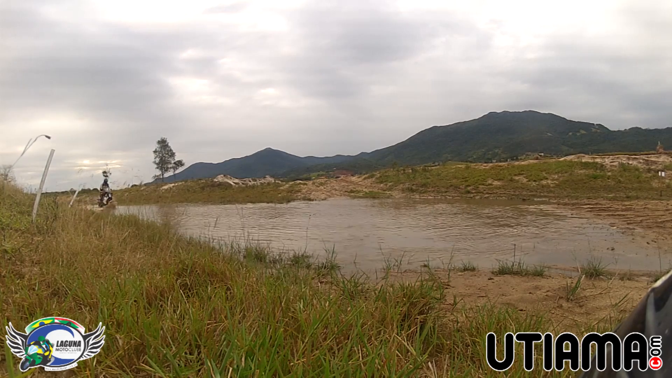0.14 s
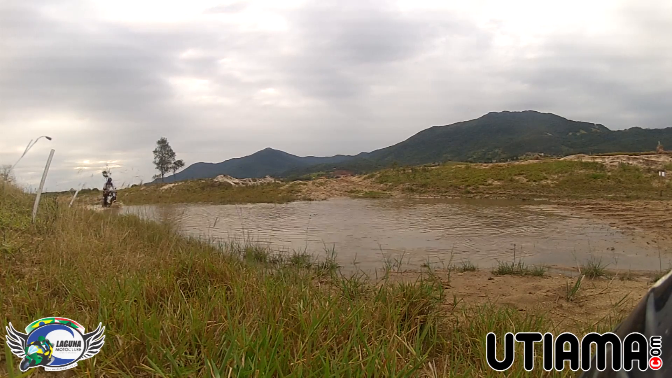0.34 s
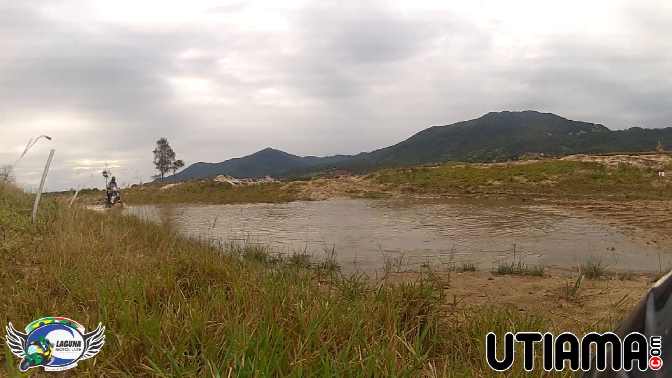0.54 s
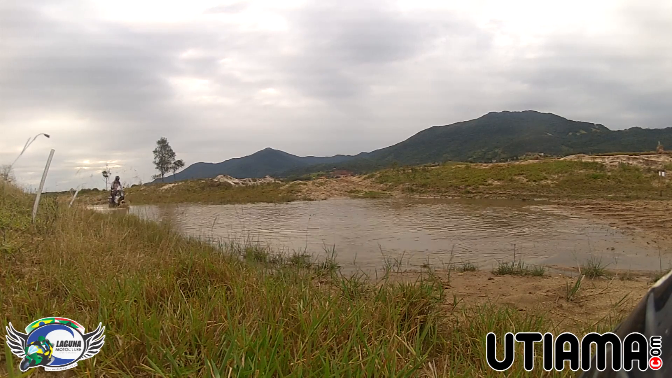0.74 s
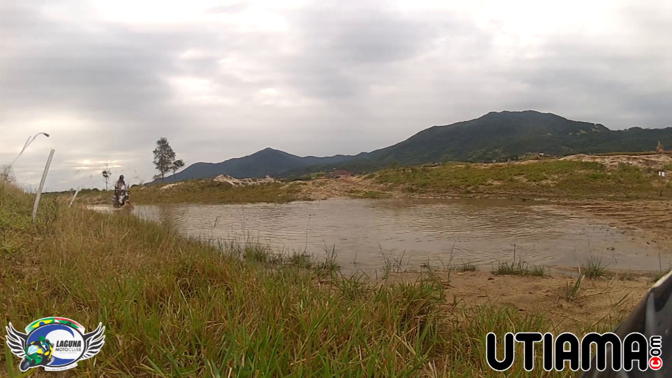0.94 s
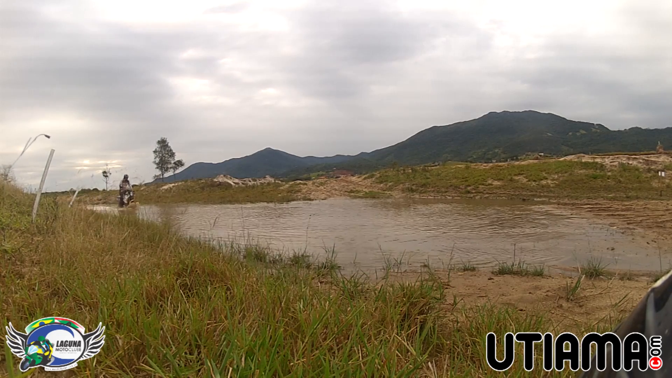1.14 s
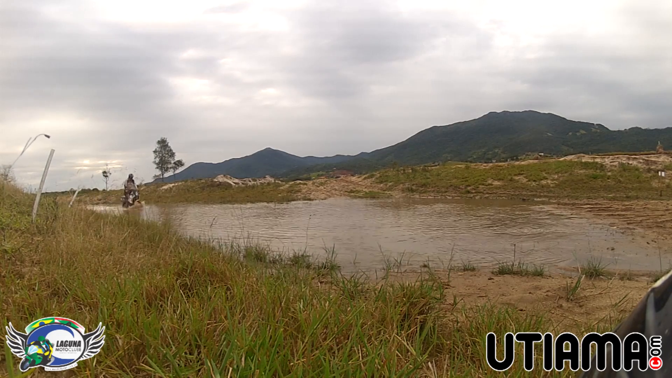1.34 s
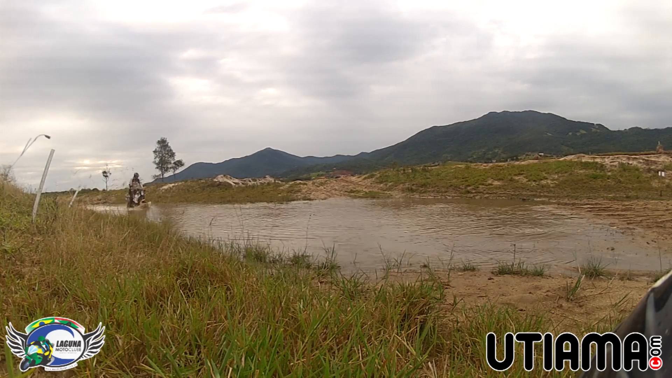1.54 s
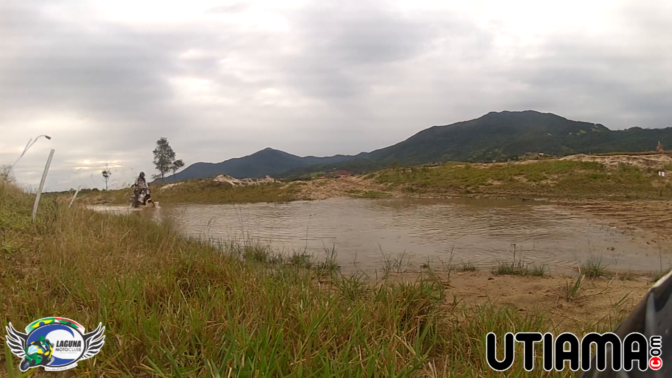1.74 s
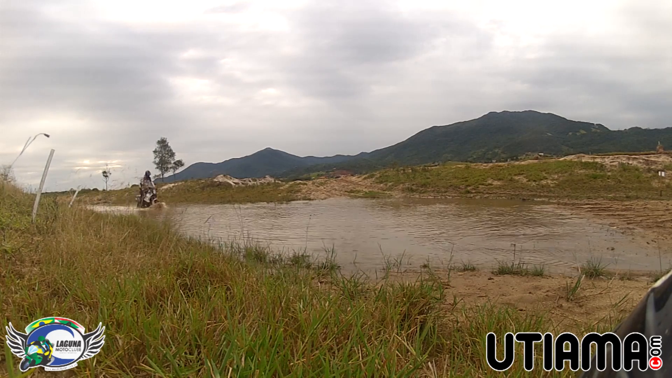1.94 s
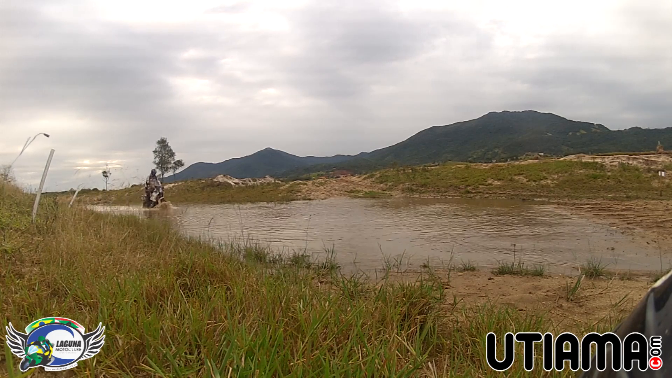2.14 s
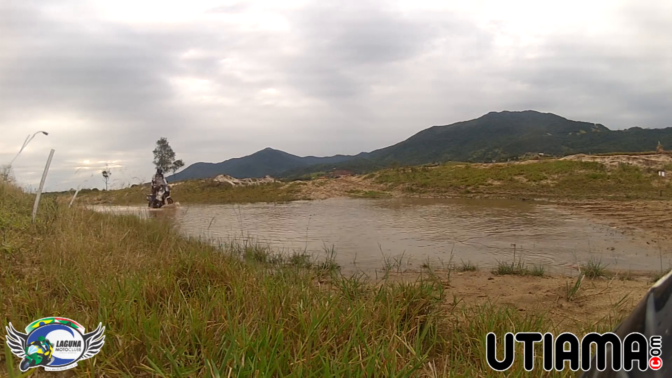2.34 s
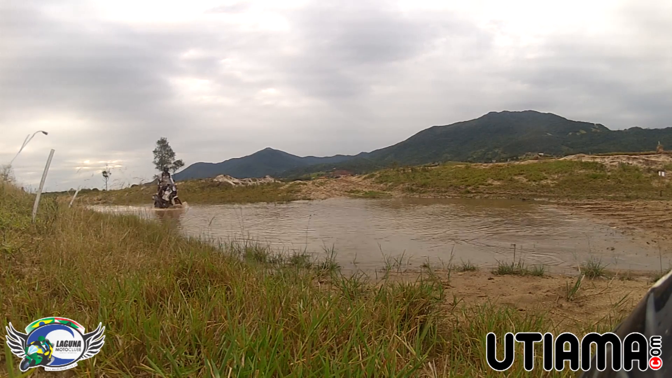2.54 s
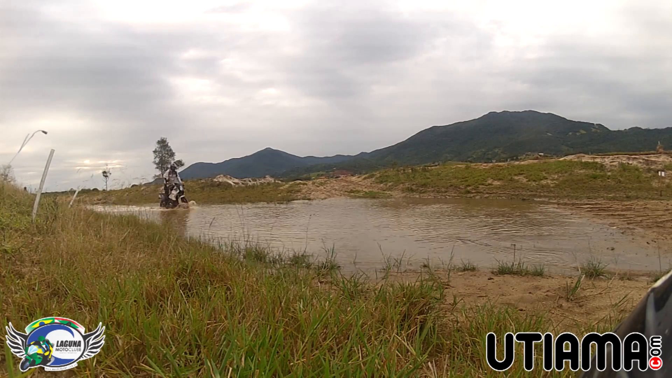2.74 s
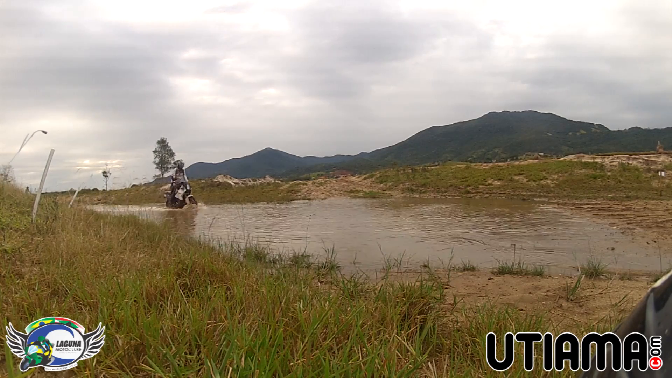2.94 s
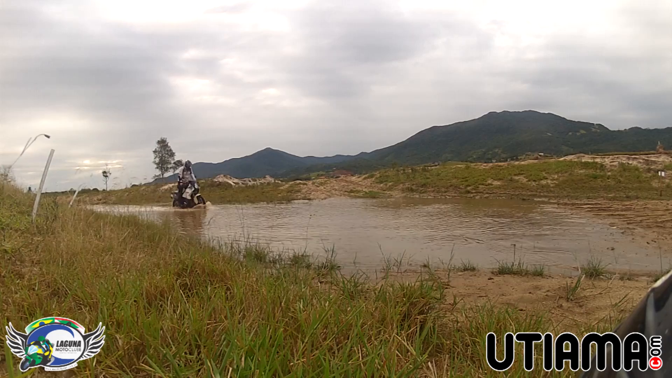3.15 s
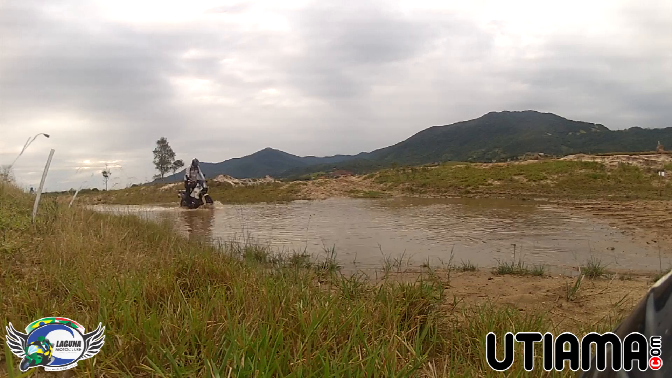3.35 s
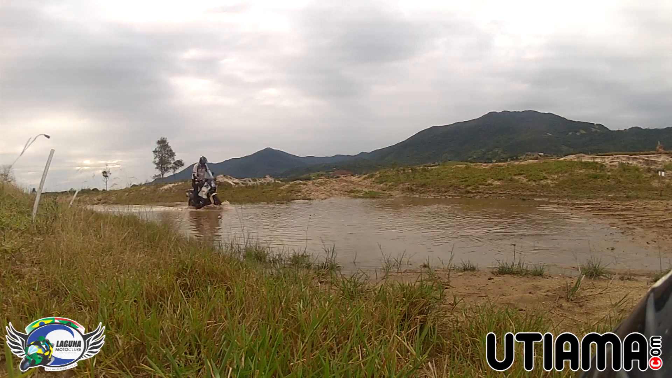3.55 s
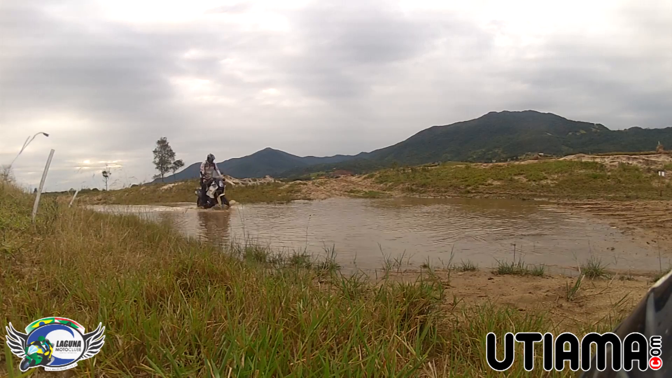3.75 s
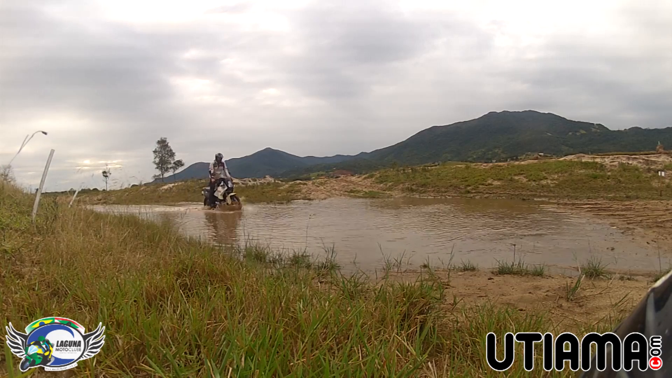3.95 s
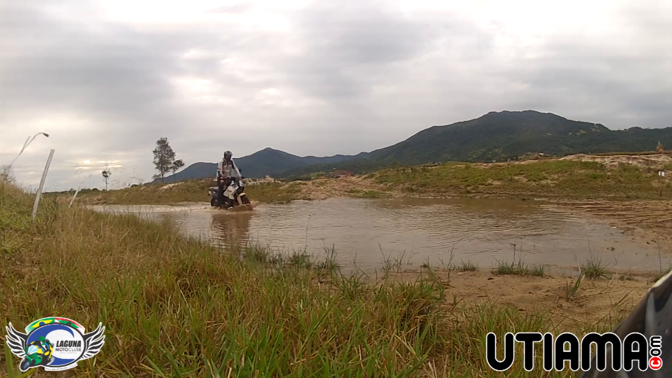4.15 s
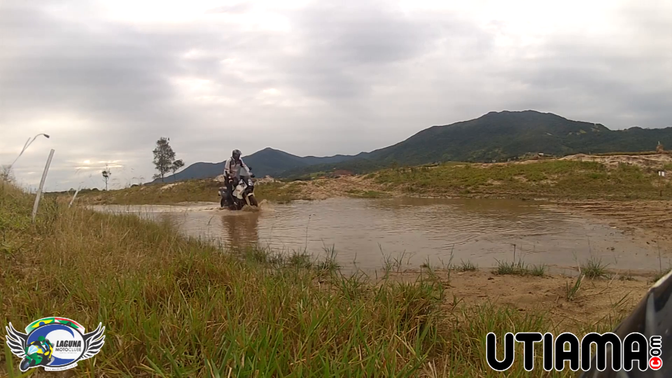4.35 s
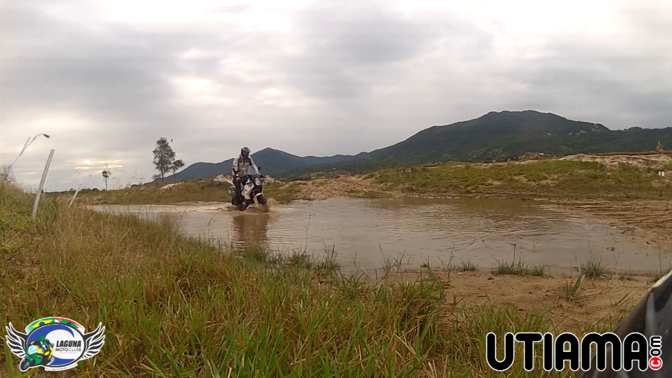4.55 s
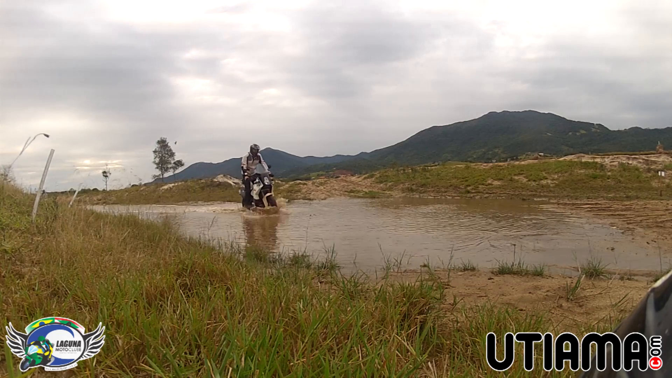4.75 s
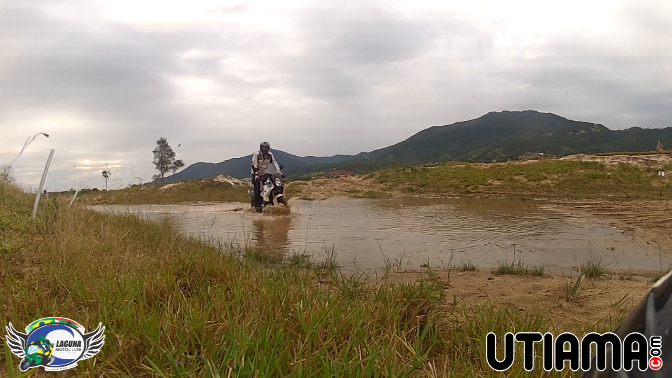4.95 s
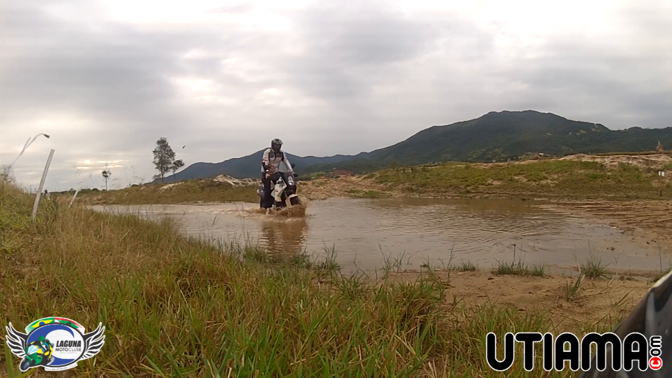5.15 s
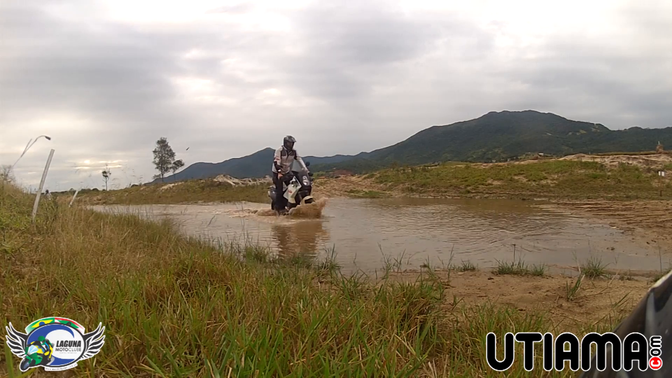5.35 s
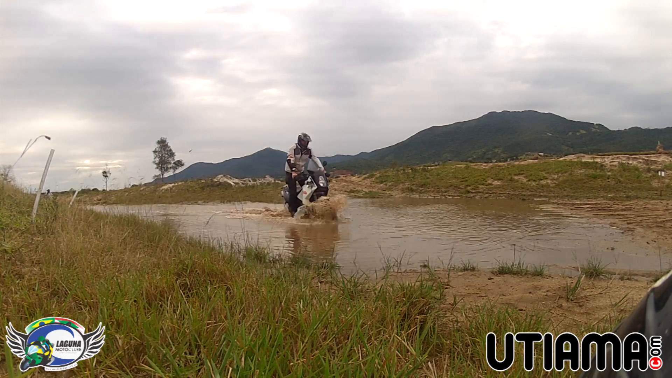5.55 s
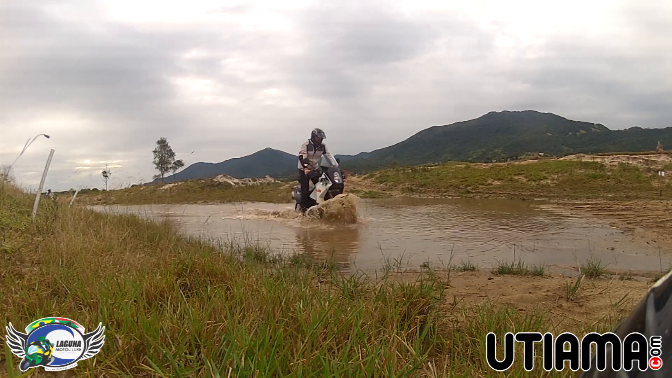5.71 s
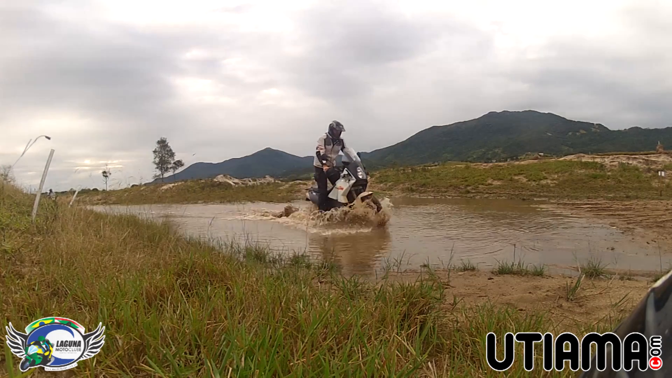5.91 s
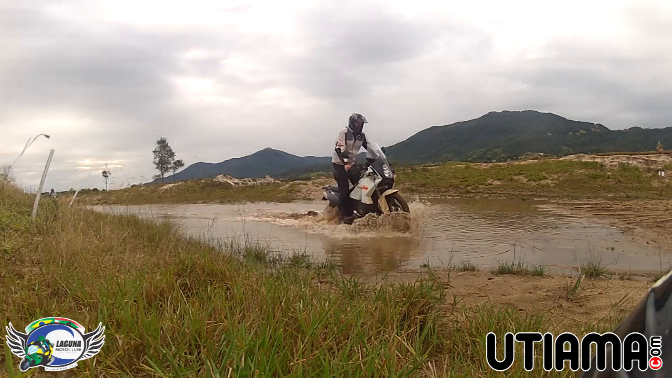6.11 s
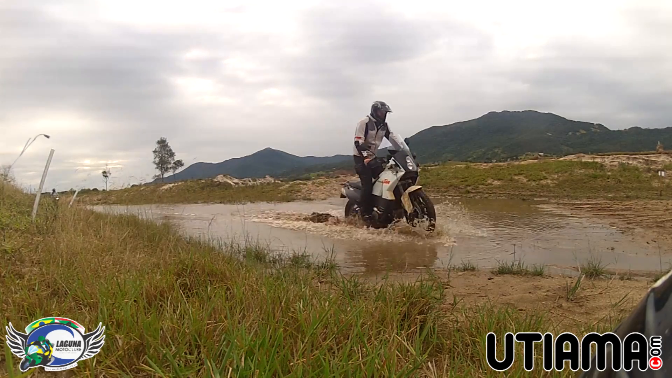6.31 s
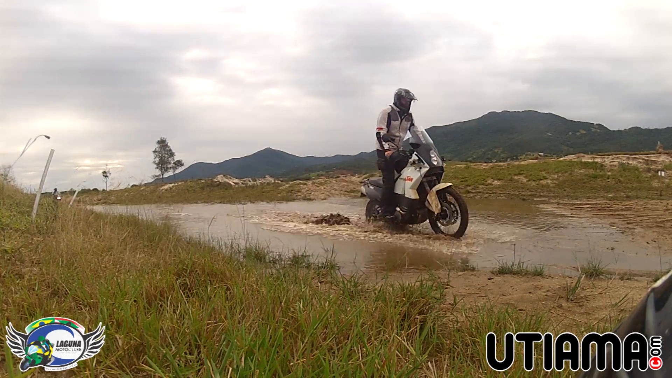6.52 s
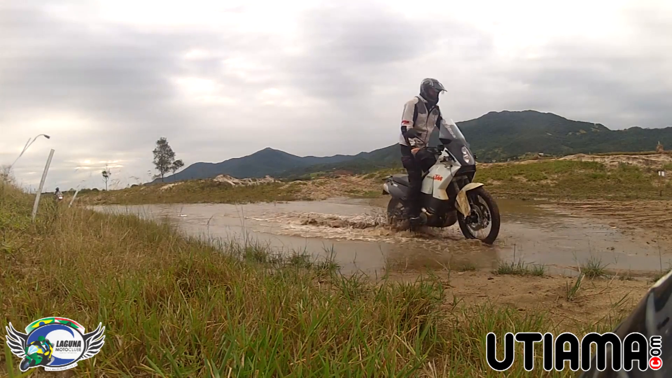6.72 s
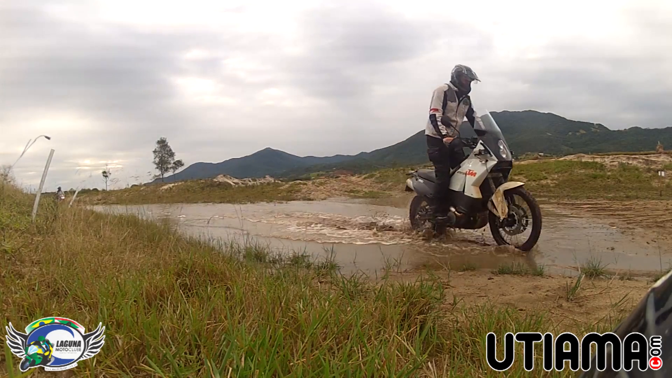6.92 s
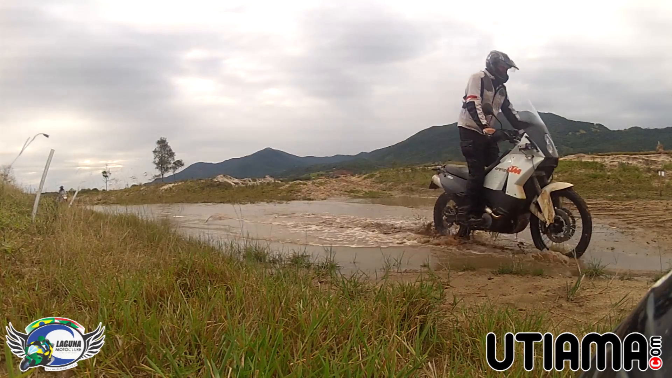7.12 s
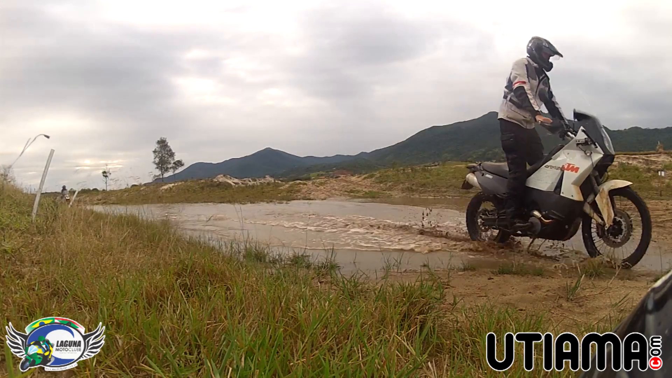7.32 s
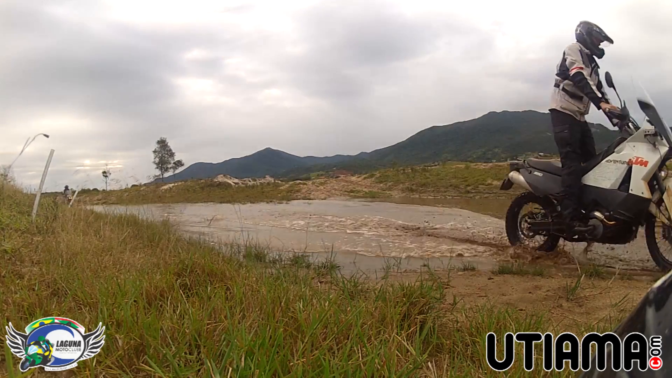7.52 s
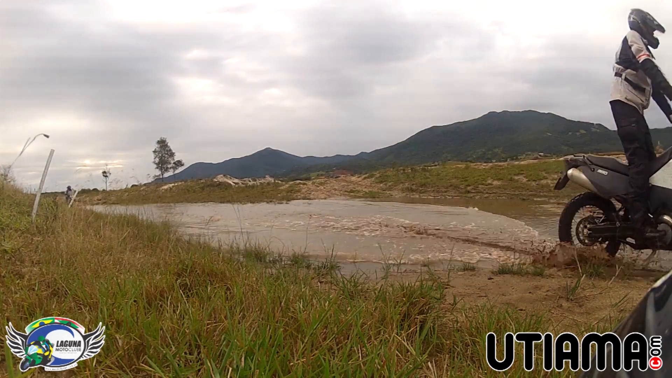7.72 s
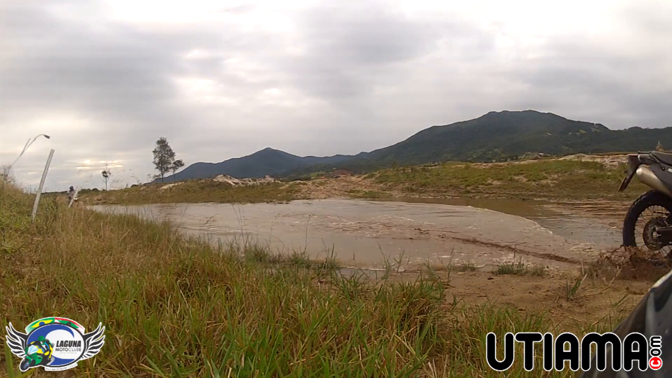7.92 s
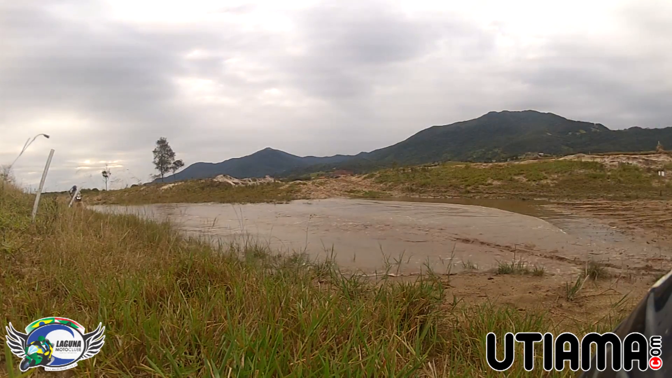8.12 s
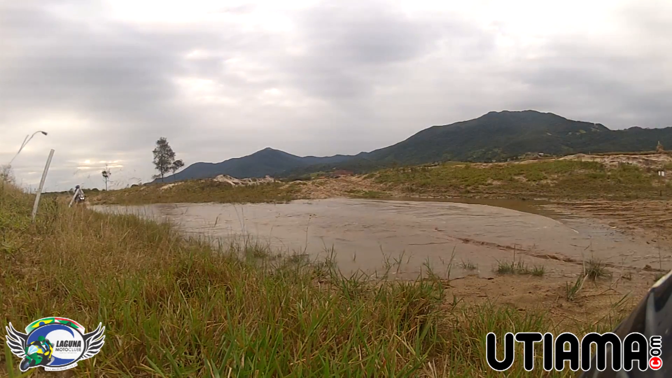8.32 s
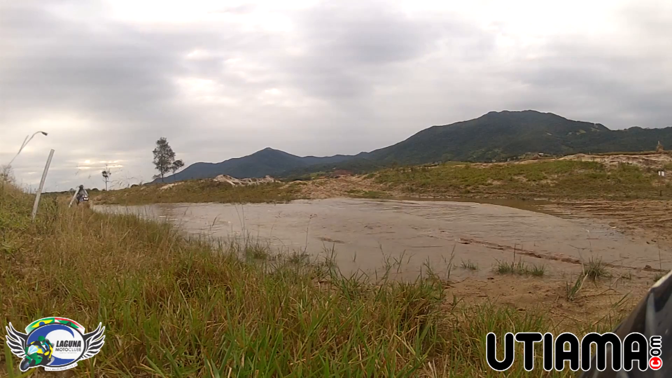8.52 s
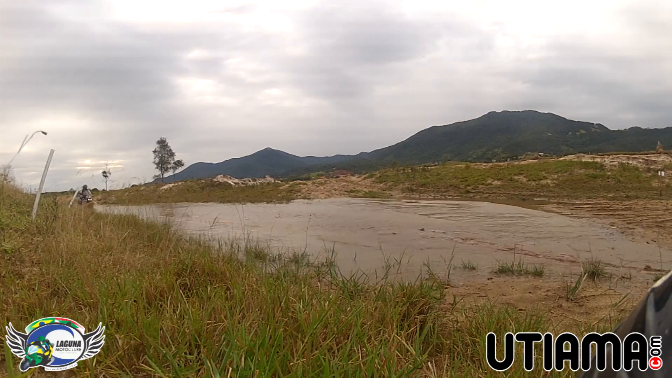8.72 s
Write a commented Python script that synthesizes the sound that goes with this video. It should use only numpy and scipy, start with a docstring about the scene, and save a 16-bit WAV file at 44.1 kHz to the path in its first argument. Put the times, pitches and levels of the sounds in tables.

```python
"""A muddy ford between earth banks: a V-twin motorcycle wades in on a blipped throttle and passes close.
Two unevenly spaced cylinders puff through the silencers, and the banks throw back a dull echo.
Valve gear and chain clatter, gears whine, and the wheels churn, spray and twice plunge deeper.
A small action camera samples it coarsely and holds each sample, mirroring it into a thin treble sizzle."""
import sys
import numpy as np
from scipy import signal
from scipy.fft import rfft, irfft
from scipy.io import wavfile
from scipy.ndimage import uniform_filter1d

SR = 44100
rng = np.random.default_rng(int(sys.argv[2]) if len(sys.argv) > 2 else 0)


def dump_mix(stems):
    """Bounce the given channels to the path in sys.argv[1] as a 16-bit WAV at rate SR."""
    frames = np.atleast_2d(stems).T  # one column per channel
    limited = np.clip(frames, -1, 1)  # hard clip at full scale
    pcm = np.round(limited * 32767).astype(np.int16)
    wavfile.write(sys.argv[1], SR, pcm)


N = 391166
TIME = np.arange(N) / SR
CRANK_START, SECOND_FIRING = -.235, .390  # in four-stroke cycles
CRUISE_HZ, REFERENCE_M = 20, 10  # engine speed and distance that leave the base levels unchanged

# the revs, in four-stroke cycles per second: time_s, speed_hz
ENGINE_SPEED = [(0.0, 28.5), (0.22, 22.62), (0.38, 23.74), (0.63, 37.23), (0.82, 34.34), (1.24, 30.83),
                (1.3, 32.47), (1.46, 30.48), (1.62, 34.05), (1.75, 28.74), (1.96, 32.02), (2.1, 32.43),
                (2.19, 27.86), (2.66, 17.95), (2.81, 18.68), (3.04, 27.01), (3.23, 22.28), (3.54, 24.3),
                (3.83, 21.31), (3.93, 23.26), (4.15, 18.33), (4.49, 23.82), (4.61, 24.08), (4.86, 19.99),
                (5.58, 20.0), (5.71, 21.41), (5.89, 20.01), (6.07, 15.35), (6.25, 13.84), (6.44, 19.34),
                (6.63, 18.89), (6.83, 22.48), (7.07, 20.69), (7.24, 20.61), (7.38, 17.58), (7.59, 15.72),
                (8.01, 17.0), (8.25, 16.87), (8.38, 18.01), (8.45, 16.87), (8.87, 17.09)]
# throttle twists that load the engine, negative where it snaps shut: centre_s, width_s, load_db
THROTTLE_BLIPS = [(.68, 0.42, 6.5), (1.58, 0.062, 7), (2.02, 0.12, 4.5), (2.25, 0.084, -3), (2.98, 0.09, 2),
                  (3.5, 0.093, -1), (4.45, 0.11, 4.5), (7.1, 0.16, 3)]
# the bike's approach: time_s, distance_m
APPROACH = [(0, 35), (1, 26.5), (2.3, 24), (3.1, 17.1), (3.6, 12.4), (4.05, 18), (4.5, 14), (5.1, 14.1),
            (5.75, 12.3), (6.15, 8.4), (6.55, 6.2), (7, 6.83), (7.65, 3.45), (8.4, 3.3), (8.87, 3.9)]
# perspective on the bike: time_s, far_share, tail_share, close_spray_share
PERSPECTIVE = [(0, 1, 0.49, 0.1), (2.1, 0.63, 0, 0.2), (2.7, 0.14, 0, 0.28), (5.8, 0.03, 0, 0),
               (7.1, 0, 0.22, 1), (7.8, 0.01, 0.8, 1), (8.3, 0, 0.78, 0.92)]

# the engine's voices in the mix: base_db, rev_db_per_octave, load_share, far_db, tail_db
FIRST_BLOWDOWN_VOICE = (-54.5, 10, 0.5, -7.5, -3)
SECOND_BLOWDOWN_VOICE = (-53, 5, 0.45, -1.5, -7.5)
PISTON_VOICE = (-54.5, 17, 0.36, -5, 3)
RASP_VOICE = (-70.5, 17.5, 0.92, -20.5, -7.5)
CLATTER_VOICE = (-56.5, -0.5, 1.5, -48.5, -3.5)
GEAR_VOICE = (-60, 7.5, 0.58, -9.5, -4)

# standing waves in the pipes, ringing on between firings: pitch_hz, width_hz, gain_db
PIPE_MODES = [(89.7, 7.2, -1), (106.7, 29, 1.5), (135.4, 13.6, 1), (158.8, 10.2, 0.5), (222.5, 3.8, 4),
              (252.6, 10.8, 0), (314.6, 8.8, -2.5), (427, 10.3, 3.5)]
# silencer tone from far off, from the front and from the tail: frequency_hz, gain_db
SILENCER_FAR_EQ = [(15, -14), (40, -19), (60, 10), (82, -8.5), (98, -12), (116, 5), (135, -8.5), (165, -3),
                   (200, -11.5), (260, -20.5), (330, -2), (375, -12), (440, -25), (560, -21.5), (850, -50)]
SILENCER_FRONT_EQ = [(15, -1), (40, -28.5), (58, 7.5), (78, -11.5), (105, 1.5), (135, -8), (165, -4),
                     (200, -9), (260, -8), (330, -7.5), (375, -20), (440, -12), (500, -21), (570, -33),
                     (660, -34.5), (850, -56)]
SILENCER_TAIL_EQ = [(15, -72), (40, -4), (58, 9), (80, 1), (105, 0), (140, 1), (165, -0.5), (200, -5.5),
                    (275, 0.5), (330, -7), (375, -23.5), (440, -18.5), (520, -23.5), (600, -51), (850, -30)]
# ring of the silencer's shell: pitch_hz, width_hz, gain_db
SHELL_MODES = [(426.6, 41.5, 1), (507.4, 57, -3.5), (619, 72, -12)]
# ring of the engine casing from the front and from the tail: pitch_hz, width_hz, gain_db
CASING_FRONT_MODES = [(1220, 120, -13), (1674, 120, 1.5), (1614, 34, 5.5), (1874, 80, 9.5), (2290, 23, 14),
                      (2946, 17, -50), (3610, 13, 0)]
CASING_TAIL_MODES = [(1125, 50, 10.5), (1720, 63, 0), (1945, 62, 0), (2090, 54, 7), (2163, 41, 15),
                     (2980, 67, 1)]
# tone of the chain and gear whirr: frequency_hz, gain_db
WHIRR_EQ = [(1200, -93), (2100, -14.5), (2280, 12), (2400, 24.5), (2520, 22), (2660, -47.5), (4000, -51)]

# fader moves for the water off the wheels, ahead of distance and trim: time_s, churn_db, spray_db
WATER_FADERS = [(0, -65.5, -66.5), (2.3, -65.5, -59.5), (3.5, -69.5, -60.5), (4.1, -66.5, -62.5),
                (5.5, -64.5, -64), (6.6, -67, -59), (6.9, -64, -57), (7.8, -77.5, -62.5), (8.2, -76, -68.5),
                (8.87, -75.5, -72.5)]
# tone of the churn, the spray and the spray up close: frequency_hz, gain_db
CHURN_EQ = [(100, -13), (300, 9), (500, -1), (720, -7.5), (850, -4), (1000, -7.5), (1220, -3.5),
            (1350, -1.5), (1700, -7), (2700, -8.5), (6000, -17)]
SPRAY_EQ = [(800, -26), (1600, -0.5), (2050, 4.5), (2300, 7), (2650, -8), (2810, 6.5), (3050, 5.5),
            (3500, -5), (3800, 10.5), (4100, -11), (4550, 2.5), (4900, -0.5), (5250, 8), (6000, -20.5)]
CLOSE_SPRAY_EQ = [(800, -39.5), (1600, 6), (2300, -4), (2700, -6.5), (3050, 5.5), (3350, 0), (3680, 11),
                  (4050, -39), (4600, -29), (5250, 4), (6000, -15)]
# slapback from the earth banks: delay_s, gain_db
BANK_ECHOES = [(.0135, -22), (.0215, -19.5), (.031, -19.5), (.047, -23)]
# the front wheel ploughs into deeper water: centre_s, width_s, level_db
PLUNGES = [(4.4, 0.1, -73), (6.525, 0.15, -62)]
# narrow bands that the camera's housing swallows: centre_hz, width_hz, cancelling_gain_db
HOUSING_DIPS = [(1360, 140, -3.5), (2710, 98, -4.5), (2940, 47, -1), (3565, 110, -10.5)]


def undb(db):
    """Decibels to gain."""
    return 10 ** (np.asarray(db) / 20)


def curves(table):
    """One automation curve per value column, in straight lines between the times."""
    times, *columns = np.transpose(table)
    return [np.interp(TIME, times, column) for column in columns]


def swells(table):
    """A bell-shaped swell for each row of centre_s, width_s, height."""
    return sum(height * np.exp(-.5 * ((TIME - centre) / width) ** 2) for centre, width, height in table)


def equalise(x, points, size=8192):
    """Causal EQ through points of frequency_hz, gain_db, built from its cepstrum."""
    hz, db = np.transpose(points)
    bins = np.maximum(np.arange(size // 2 + 1) * SR / size, 1)
    cepstrum = irfft(np.log(undb(np.interp(np.log(bins), np.log(hz), db))))
    cepstrum[1:size // 2] *= 2
    cepstrum[size // 2 + 1:] = 0
    return signal.oaconvolve(x, irfft(np.exp(rfft(cepstrum))))[:N]


def ring(x, modes):
    """Play a sound through parallel resonators."""
    return sum(undb(db) * signal.lfilter(*signal.iirpeak(hz, hz / width, fs=SR), x)
               for hz, width, db in modes)


def normalise(x, lo_hz, hi_hz):
    """Scale a sound to rms 1 within a band."""
    band = signal.butter(4, [lo_hz, hi_hz], "band", fs=SR, output="sos")
    return x / np.std(signal.sosfilt(band, x))


def wobble(rate_hz):
    """Random modulation that glides to a new value rate_hz times a second; spread 1."""
    hold = int(SR / rate_hz)
    steps = np.repeat(rng.standard_normal(N // hold + 1), hold)
    slewed = uniform_filter1d(steps, hold)[:N]
    return slewed / np.std(slewed)


def perspective():
    """Crossfades for the far, front and tail sound of the bike, and for the close spray."""
    far, tail, close = np.clip(curves(PERSPECTIVE), 0, 1)
    return dict(far=far, front=np.clip(1 - far - tail, 0, 1), tail=tail, close=close)


def nearness_db():
    """The bike gains 16 dB for a tenfold drop in distance."""
    return -16 * np.log10(curves(APPROACH)[0] / REFERENCE_M)


def voice_db(voice, choke_hz=np.inf):
    """An engine voice's level follows the revs (up to choke_hz), load, perspective and distance."""
    base_db, rev_db, load_share, far_db, tail_db = voice
    view = perspective()
    octaves = np.log2(np.minimum(curves(ENGINE_SPEED)[0], choke_hz) / CRUISE_HZ)
    effort_db = rev_db * octaves + load_share * swells(THROTTLE_BLIPS)
    return base_db + effort_db + far_db * view["far"] + tail_db * view["tail"] + nearness_db()


def puff(crank, at, width, scatter_db):
    """One bell-shaped puff a cycle, its area scattered around 1; at and width are in cycles."""
    cycle = np.round(crank - at)
    strength = undb(scatter_db * rng.standard_normal(size=512))[cycle.astype(int)]
    return strength * np.exp(-.5 * ((crank - at - cycle) / width) ** 2) / (width * np.sqrt(2 * np.pi))


def exhaust(crank):
    """Each exhaust valve opens with a sharp blowdown; the piston then pushes out the rest."""
    first = undb(voice_db(FIRST_BLOWDOWN_VOICE)) * puff(crank, 0, width=.003, scatter_db=.5)
    second = undb(voice_db(SECOND_BLOWDOWN_VOICE)) * puff(crank, SECOND_FIRING, width=.005, scatter_db=.5)
    strokes = puff(crank, at=.2154, width=.021, scatter_db=.3)
    strokes += undb(-2) * puff(crank, at=.5596, width=.031, scatter_db=1.4)
    push = undb(voice_db(PISTON_VOICE, choke_hz=27)) * strokes
    turbulence = 1 + undb(-11) * rng.standard_normal(N)
    flow = (first + second + push) * turbulence
    flow = undb(-3.5) * (flow + ring(flow, PIPE_MODES))
    # steady outflow makes no sound
    flow = signal.sosfilt(signal.butter(1, 8, "high", fs=SR, output="sos"), flow)
    view = perspective()
    return (view["far"] * equalise(flow, SILENCER_FAR_EQ)
            + view["front"] * equalise(flow, SILENCER_FRONT_EQ)
            + view["tail"] * equalise(flow, SILENCER_TAIL_EQ))


def shell_rasp(crank):
    """Both blowdowns shake the silencer's shell, which growls above the exhaust as the revs climb."""
    knocks = undb(-4) * puff(crank, 0, width=.003, scatter_db=-1)
    knocks += puff(crank, SECOND_FIRING, width=.0038, scatter_db=2.5)
    return undb(voice_db(RASP_VOICE)) * ring(ring(knocks, SHELL_MODES), SHELL_MODES)


def valves_and_chain(crank):
    """Valves tick with the crank and ring the casing, over the whirr of chain and gears."""
    valves = sum(puff(crank, at, width=.076, scatter_db=3) for at in (.12, .38, .62, .85))
    knocks = (1 + .36 * valves) * rng.standard_normal(N)
    front = normalise(ring(knocks, CASING_FRONT_MODES), 1160, 2320)
    rear = normalise(ring(knocks, CASING_TAIL_MODES), 1160, 2320)
    rear_share = perspective()["tail"] ** 3
    clatter = np.sqrt(1 - rear_share) * front + np.sqrt(rear_share) * rear
    rattle = (1 + .056 * valves) * rng.standard_normal(N)
    whirr = normalise(equalise(rattle, WHIRR_EQ), 2310, 3100)
    return undb(voice_db(CLATTER_VOICE) - 3) * clatter + undb(voice_db(GEAR_VOICE) - 2.5) * whirr


def gear_whine(crank, teeth_per_cycle=137):
    """Meshing teeth sing toward the front, blurred by backlash and louder at high revs."""
    rev_gain = np.clip(curves(ENGINE_SPEED)[0] / 24, 0, 1) ** 2
    backlash = .24 * wobble(250)
    whine = np.sin(2 * np.pi * (teeth_per_cycle * crank + backlash))
    flutter = 1 + .5 * wobble(120)
    return undb(voice_db(GEAR_VOICE) - 5.5) * rev_gain * perspective()["front"] * whine * flutter


def bubbles(lo_hz, hi_hz, cycles, spread_db, glide, count):
    """A bed of short decaying pings, each bending upward as its bubble nears the surface."""
    out = np.zeros(N + SR)
    for when, pitch, luck in rng.random((count, 3)):
        hz = lo_hz * (hi_hz / lo_hz) ** pitch
        age = np.arange(int(cycles * SR / hz)) / SR
        life = age * hz / cycles
        ping = np.sin(2 * np.pi * hz * age * (1 + glide * life)) * np.exp(-np.log(100) * life)
        start = int(when * N)
        out[start:start + len(age)] += undb(-spread_db * np.log(max(luck, .01))) * ping
    return out[:N] / np.std(out)


def churn_and_spray():
    """The wheels churn up a bubbly wash and throw spray that patters back as fine drops."""
    churn_db, spray_db = curves(WATER_FADERS) + nearness_db()
    gurgle = bubbles(335, 2170, cycles=4.5, spread_db=-.5, glide=.19, count=3000)
    wash = rng.standard_normal(N) * undb(1.3 * wobble(18)) + undb(-17.5) * gurgle
    churn = normalise(equalise(wash, CHURN_EQ), 470, 1406)
    drops = bubbles(1900, 9300, cycles=7.3, spread_db=3.5, glide=.24, count=5000)
    mist = rng.standard_normal(N) * undb(wobble(25)) + undb(-9.5) * drops
    close = perspective()["close"]
    spray = (1 - close) * normalise(equalise(mist, SPRAY_EQ), 2700, 6360)
    spray += close * normalise(equalise(mist, CLOSE_SPRAY_EQ), 3200, 7000)
    return undb(churn_db + 2.5) * churn + undb(spray_db - 1.5) * spray


def bank_echoes(pipes, top_hz=260):
    """The earth banks throw back the low end of the exhaust as a few short echoes."""
    dull = signal.sosfilt(signal.butter(2, top_hz, fs=SR, output="sos"), pipes)
    return sum(undb(db) * np.interp(TIME - delay, TIME, dull, left=0) for delay, db in BANK_ECHOES)


def wheel_plunges():
    """Each plunge of the front wheel folds air under the water: a swell of large bubbles."""
    envelope = swells([(centre, width, undb(db)) for centre, width, db in PLUNGES])
    return envelope * bubbles(524, 880, cycles=17, spread_db=-.5, glide=.13, count=1500)


def scene():
    """One crankshaft drives every engine layer; the water runs alongside and the banks answer."""
    crank = CRANK_START + np.cumsum(curves(ENGINE_SPEED)[0]) / SR + .0006 * wobble(30)  # in cycles
    pipes = exhaust(crank) + shell_rasp(crank)
    engine = pipes + valves_and_chain(crank) + gear_whine(crank)
    return (engine + churn_and_spray() + bank_echoes(pipes) + wheel_plunges())[None]


def record(dry):
    """The camera's housing dulls a few bands; its sample-and-hold mirrors the sound into the treble."""
    hold_hz, hold_ticks = 12000, 4
    band_hz, top_hz = 5650, 15350  # low-pass before and after the hold
    housed = dry - ring(dry, HOUSING_DIPS)
    narrow = signal.sosfilt(signal.ellip(8, .2, 60, band_hz, fs=SR, output="sos"), housed)
    coarse = signal.resample_poly(narrow, hold_hz, SR, axis=1)
    held = np.repeat(coarse, hold_ticks, axis=1)
    sizzling = signal.resample_poly(held, SR, hold_ticks * hold_hz, axis=1)[:, :N]
    return signal.sosfilt(signal.ellip(10, .2, 80, top_hz, fs=SR, output="sos"), sizzling)


dry = scene()
out = record(dry)
dump_mix(out)
```